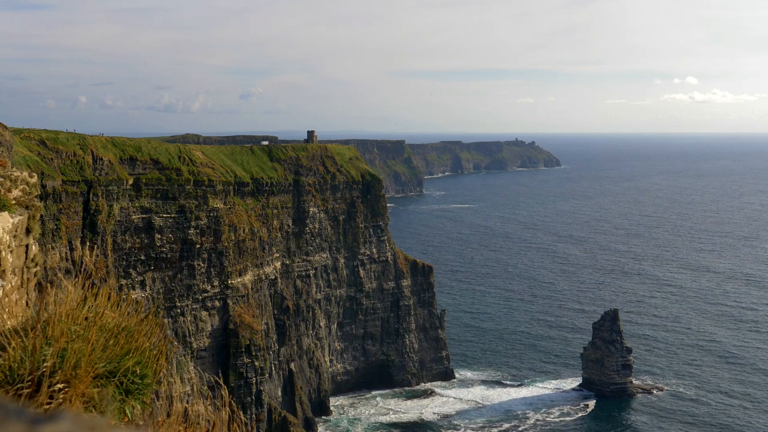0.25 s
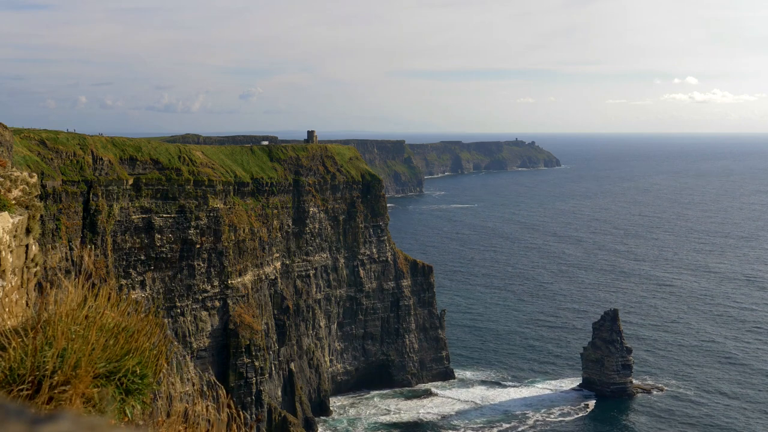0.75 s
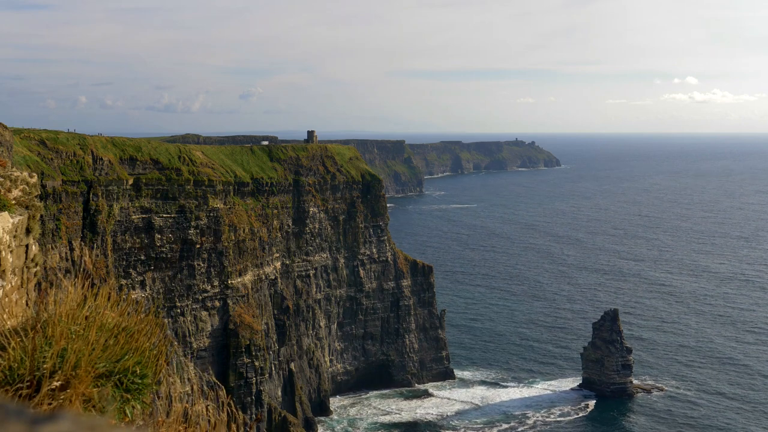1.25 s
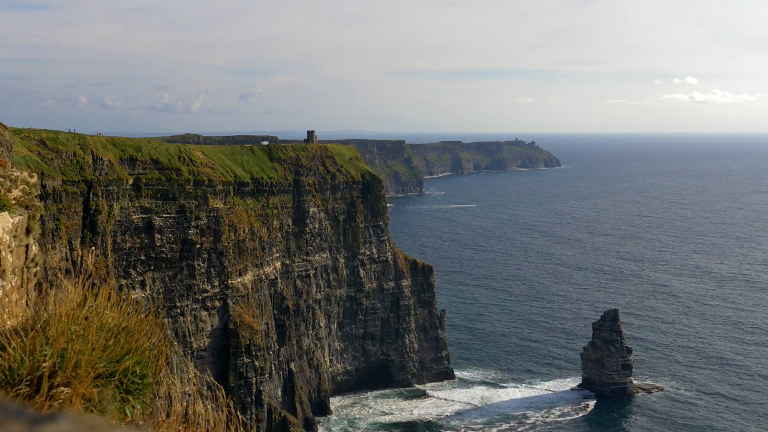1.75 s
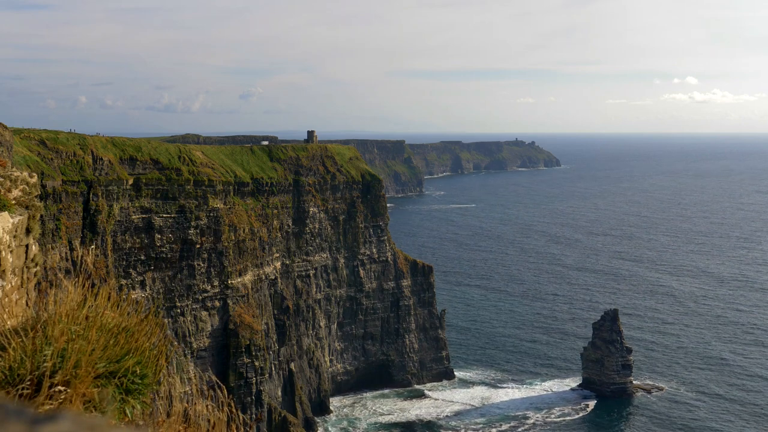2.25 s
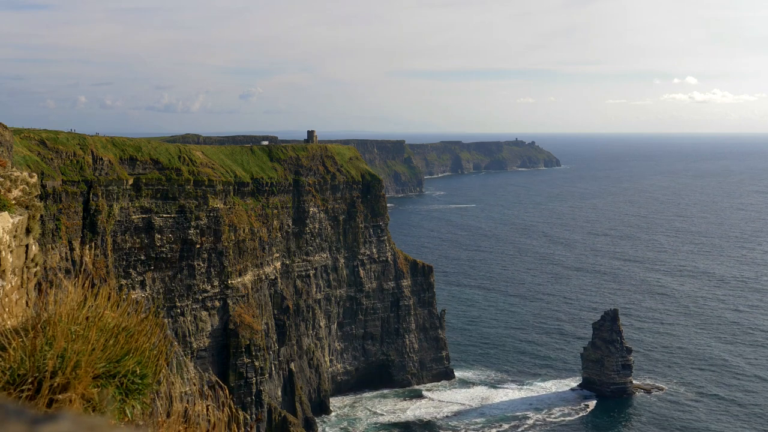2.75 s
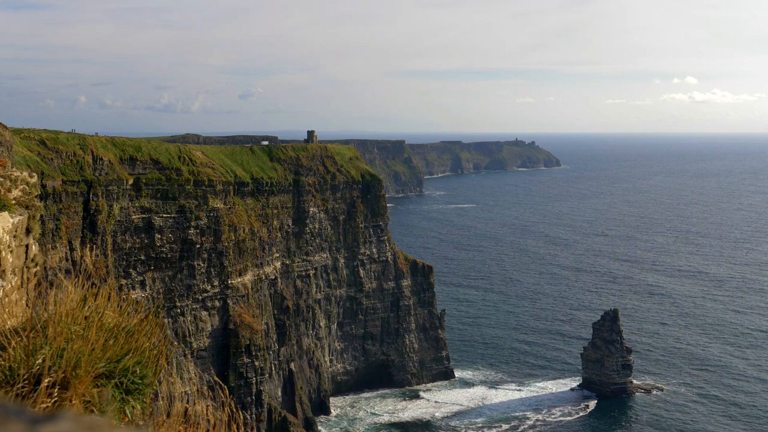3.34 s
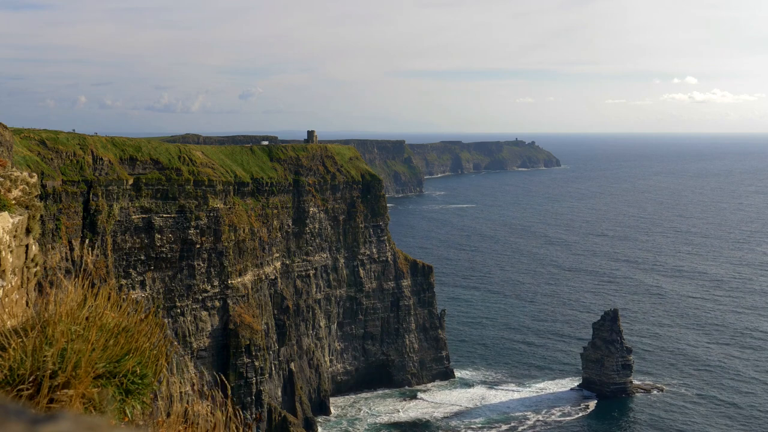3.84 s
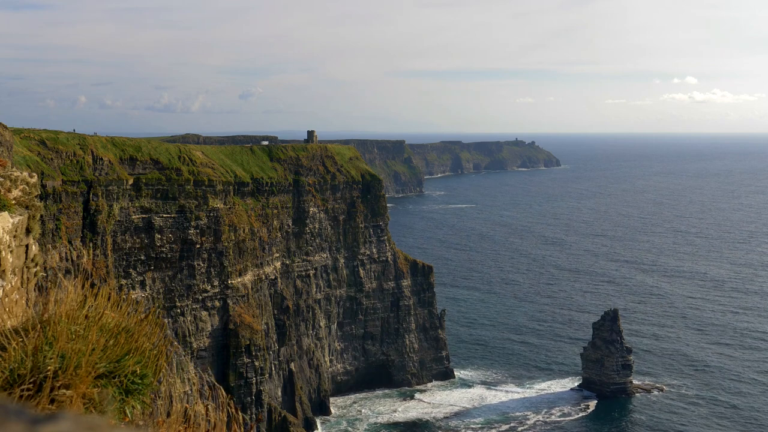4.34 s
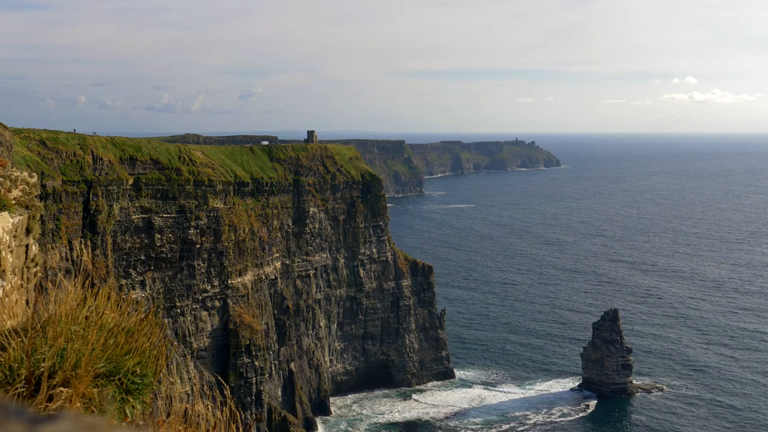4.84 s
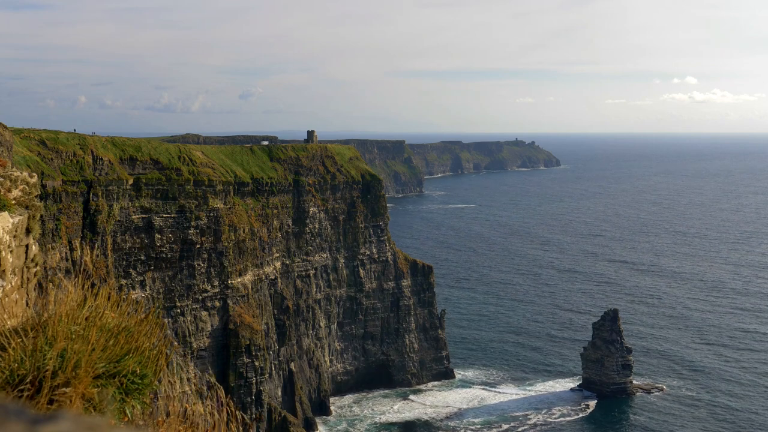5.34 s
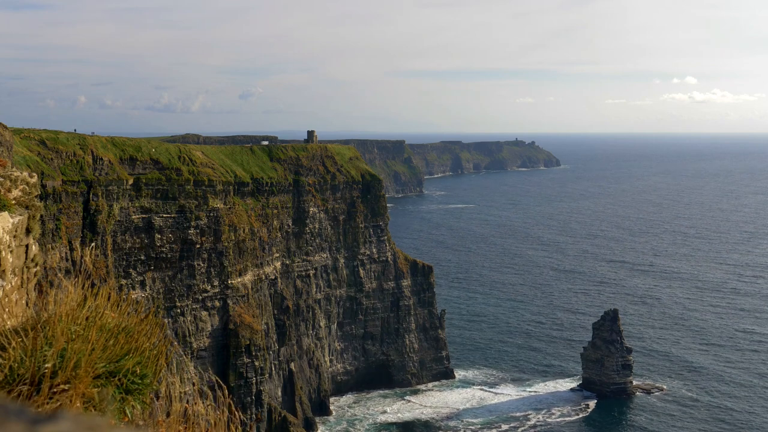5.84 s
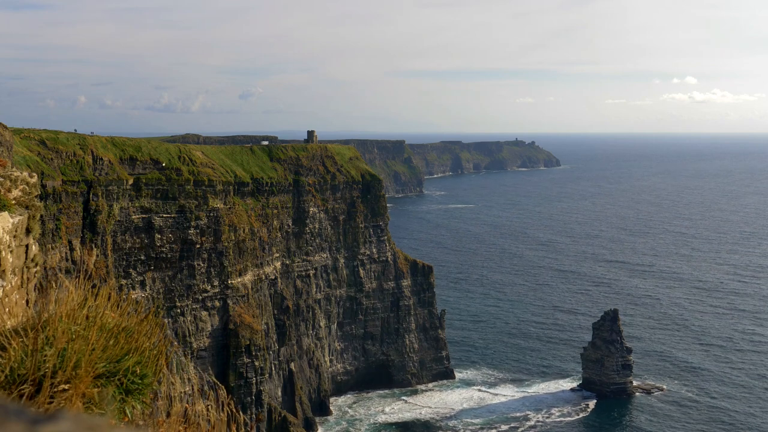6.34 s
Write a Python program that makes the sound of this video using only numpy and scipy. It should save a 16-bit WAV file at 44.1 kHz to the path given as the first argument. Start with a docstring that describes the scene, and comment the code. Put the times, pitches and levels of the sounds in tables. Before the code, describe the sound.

Distant sea surf rumbles below a cliff under short gull cries and thin whistles, with one low wave boom and hissing foam.

```python
"""Below a sea cliff, gulls cry over a steady far roar of surf; one wave booms on the rock and its foam hisses.
The water is a sum of countless random sources, so it is noise with a shaped spectrum and a moving level.
The birds are pitched sources: thin whistles, harmonic cries, and squawks of pulses through a resonant
throat, all scattered back by the rock face. The stereo image is very wide: most sound reaches the two
channels in opposite polarity, and only the boom is alike in both."""
import sys
import numpy as np
from scipy import signal
from scipy.fft import rfft, irfft, next_fast_len
from scipy.io import wavfile
from scipy.ndimage import uniform_filter1d, map_coordinates

SR = 44100
rng = np.random.default_rng(int(sys.argv[2]) if len(sys.argv) > 2 else 0)


def master_out(mix):
    """Clip the mix to full scale and print it as 16-bit PCM to the path in sys.argv[1]."""
    frames = np.transpose(np.atleast_2d(mix))
    ceiling = np.clip(frames, -1, 1)
    pcm = np.round(ceiling * 32767).astype(np.int16)
    wavfile.write(sys.argv[1], SR, pcm)


N = 289737

# Spectral densities of the water's noises: frequency_hz, relative_density_db
ROAR_SPECTRUM = [(15, -34), (40, -45), (90, -1.5), (140, 1), (200, -5), (300, -14), (450, -23.5),
                 (800, -38), (3000, -120)]
WASH_SPECTRUM = [(150, -1), (300, -4), (600, -2), (1000, -0.5), (1400, 0.5), (2100, -0.5), (3000, -4),
                 (5000, -22), (9000, -49), (12000, -60)]
BOOM_SPECTRUM = [(12, -10), (25, -8), (45, -5), (70, 0.5), (110, -1), (160, -11.5), (300, -29.5),
                 (1500, -120)]
SEETHE_SPECTRUM = [(500, -70), (1200, -14.5), (2200, -3.5), (3200, -0.5), (4600, -0.5), (6000, -5.5),
                   (9000, -63), (12000, -60)]
HISS_SPECTRUM = [(1000, -68), (3000, -21), (5000, -3.5), (6500, -1.5), (8000, -5), (10000, -12),
                 (11800, -18), (12400, -28), (13600, -42)]
SPRAY_SPECTRUM = [(1000, -30), (2500, -2), (5000, -4), (9000, -5), (13000, -39)]
# Left-right likeness of wash, foam and spray: frequency_hz, correlation
SURF_CORRELATION = [(280, -.33), (600, -.43), (1300, -.33), (2800, -.42), (6000, -.53), (13000, -.45)]
# Envelopes of the far surf: time_s, roar_db, wash_db
SURF_LEVELS = [(0.0, -51, -53.5), (0.25, -50, -53.5), (0.45, -49.5, -50), (0.7, -49, -54),
               (1.1, -50.5, -54.5), (1.72, -48.5, -53.5), (2.5, -50.5, -52), (3.3, -46.5, -52.5),
               (4.0, -46.5, -51), (4.26, -44, -51.5), (4.6, -48, -51), (4.94, -47.5, -50), (5.15, -50, -50),
               (6.2, -49, -53), (6.57, -50, -53.5)]
# The roar leans left as the wave drains: time_s, left_over_right_db
ROAR_BALANCE = [(0, -1), (1.5, 1.5), (3.4, 3), (4.7, 5), (5.2, 3), (6.57, 2)]
# Envelope of the wave on the rock: time_s, level_db
BOOM_LEVELS = [(0.0, -49.5), (0.6, -47), (1.1, -50.5), (1.3, -46.5), (1.65, -49), (2.25, -45), (2.55, -40),
               (2.8, -44.5), (2.95, -40.5), (3.1, -48), (3.44, -38.5), (3.74, -40.5), (3.95, -35),
               (4.15, -38), (4.35, -39.5), (4.75, -41.5), (5.2, -45.5), (5.7, -46), (6.57, -47)]
# Envelopes of the foam: time_s, hiss_db, seethe_db
FOAM_LEVELS = [(0.0, -65, -59.5), (0.8, -62, -59), (1.1, -63, -58), (1.68, -58, -55), (1.78, -56, -53.5),
               (2.25, -56, -52.5), (2.42, -53, -49.5), (2.51, -50.5, -47), (2.69, -52, -49),
               (3.3, -50.5, -49.5), (3.82, -50, -48.5), (4.34, -51.5, -50), (5.07, -52, -50.5),
               (5.6, -54, -50.5), (6.57, -55, -53.5)]
# Bursts of spray: peak_s, left_db, right_db, half_length_s
SPRAY_BURSTS = [(0.947, -62, -58, 0.013), (1.748, -58, -52, .01), (2.155, -56, -52, 0.022),
                (6.018, -50, -54, 0.013)]
# Whistles that bend once:
# start_s, to_turn_s, after_turn_s, start_hz, turn_hz, end_hz, left_db, right_db, fade_db
SHORT_WHISTLES = [ (0.0, .03, .03, 4800, 4750, 4750, -60, -53, 0),
                  (0.0, .01, .02, 2420, 2410, 2370, -50, -52, 2),
                  (0.008, .02, 0.04, 2940, 2880, 2740, -50, -55, 10),
                  (0.808, 0.039, 0.055, 2020, 2020, 1940, -58, -49.5, 0),
                  (1.715, 0.04, .05, 4980, 4780, 4520, -53, -60, 2),
                  (2.348, .01, 0.032, 3020, 2980, 2800, -42, -52, 0),
                  (2.468, .04, .07, 4930, 4990, 5010, -47, -53, 0),
                  (4.1, 0.065, 0.015, 5040, 4940, 4990, -48, -57, 0),
                  (4.195, .02, .022, 5180, 5160, 5080, -48, -58, 0),
                  (4.232, .015, .03, 2460, 2470, 2480, -44.5, -58, -3),
                  (4.82, .01, .07, 4780, 4730, 4500, -49, -58, 0),
                  (5.205, .01, .025, 5180, 5130, 4980, -45, -58, 0),
                  (5.485, .02, .025, 3760, 3780, 3740, -49, -52, 0),
                  (5.778, .025, .015, 2380, 2450, 2560, -56, -50, 0),
                  (5.815, .025, .07, 3070, 3080, 2800, -57, -45.5, -8), ]
# Whistles that waver and swell: left_over_right_db, [time_s, pitch_hz, louder_channel_db]
WHISTLE_CONTOURS = [ (-9, [(5.298, 2300, -54), (5.31, 2370, -47), (5.328, 2530, -45), (5.345, 2700, -49),
                    (5.352, 2780, -58)]), (-15, [(.338, 4520, -54), (.364, 4760, -40.5), (.44, 5100, -44),
                    (.46, 5120, -46.5), (.56, 4890, -44.5), (.586, 4745, -49), (.64, 4695, -50),
                    (.65, 4680, -65)]), (-17, [(1.255, 4060, -56), (1.266, 4315, -44), (1.28, 4740, -44),
                    (1.3, 4960, -43), (1.326, 5105, -49), (1.358, 5016, -43), (1.376, 5080, -49),
                    (1.44, 5120, -51.5), (1.49, 5000, -47), (1.535, 4930, -48), (1.57, 4950, -53),
                    (1.6, 4920, -53), (1.608, 4920, -64)]), (8, [(1.378, 4450, -56), (1.392, 4670, -45),
                    (1.42, 4830, -51), (1.44, 4980, -51), (1.45, 5080, -62)]), (11, [(3.308, 4910, -52),
                    (3.322, 4870, -47), (3.36, 4780, -39), (3.38, 4780, -41.5), (3.405, 4770, -40),
                    (3.422, 4680, -38), (3.445, 4740, -41.5), (3.478, 4850, -41), (3.505, 4780, -54)]),
                    (21, [(4.472, 4550, -54), (4.48, 4620, -43), (4.495, 4730, -41), (4.51, 4800, -46),
                    (4.527, 4860, -44), (4.535, 4890, -58)]), (7, [(4.718, 4220, -54), (4.732, 4260, -44),
                    (4.76, 4330, -46), (4.79, 4480, -52), (4.82, 4800, -48), (4.85, 4850, -50),
                    (4.9, 4830, -52), (4.925, 4850, -60)]), (15, [(5.42, 4940, -64), (5.44, 4990, -57),
                    (5.46, 5150, -48), (5.485, 5220, -48), (5.525, 5450, -44), (5.545, 5520, -56),
                    (5.58, 5600, -54), (5.625, 5680, -50), (5.655, 5650, -62)]), ]
# Resonances of the squawking throat: centre_hz, bandwidth_hz, gain_db
FORMANTS = [(2220, 150, -3), (2940, 220, -6.5)]
# Short harsh cries: start_s, length_s, left_db
SQUAWK_EVENTS = [(2.418, 0.025, -33.5), (3.423, 0.049, -35.5)]
# Harmonic cries: left_over_right_db, [time_s, pitch_hz, second_partial_db (louder channel),
# third_over_second_db, fourth_over_second_db]
CRY_CONTOURS = [ (3, [(4.966, 1424, -58, -6, -20), (4.98, 1440, -50, -6, -20), (5.012, 1470, -50, -12, -22),
                (5.035, 1390, -53, -14, -25), (5.055, 1340, -48, -16, -25), (5.1, 1275, -49, -16, -25),
                (5.12, 1250, -58, -16, -25)]), (4, [(5.452, 1425, -54, -9, -19),
                (5.465, 1440, -45, -9, -19), (5.485, 1460, -42, -12, -22), (5.495, 1470, -54, -12, -22)]),
                (13, [(.392, 1063, -62, 0, -14), (.41, 1095, -52, 0, -14), (.44, 1125, -53, -2, -14),
                (.475, 1120, -53, -10, -14), (.5, 1101, -48, -1, -14), (.525, 1077, -47, -3, -12),
                (.54, 1072, -60, 8, -2), (.56, 1060, -51, -1, -7), (.6, 1040, -47, -3, -9),
                (.618, 1010, -50, -6, -8), (.63, 985, -62, -6, -8)]), (9.1, [(2.306, 1070, -51, -4, -10),
                (2.318, 1100, -40, -3, -10), (2.335, 1140, -39, -7, -14), (2.35, 1185, -38, -12, -18),
                (2.358, 1195, -52, -6, -18)]), (12, [(.058, 1055, -62, 8, -6), (.075, 1053, -50, 7, -8),
                (.1, 1042, -48.5, -2, -12), (.15, 1035, -46, -3, -13), (.17, 1025, -54, 3, -8),
                (.194, 975, -61, 2, -6)]), (13, [(1.295, 1092, -56, -6, -20), (1.315, 1130, -42.5, -8, -22),
                (1.35, 1130, -41.5, -11, -22), (1.385, 1065, -44, -5, -10), (1.42, 1036, -43, -13, -14),
                (1.455, 975, -42, -18, -18), (1.466, 900, -60, -16, -18)]),
                (8, [(5.525, 1347, -54, -23, -30), (5.536, 1345, -37, -23, -30),
                (5.57, 1313, -39, -23, -30), (5.582, 1295, -49, -23, -30), (5.61, 1260, -44, -23, -30),
                (5.635, 1200, -43, -23, -30), (5.648, 1160, -58, -23, -30)]),
                (15, [(5.87, 1365, -58, 8, -25), (5.885, 1410, -42, -2, -25), (5.91, 1440, -41.5, -5, -25),
                (5.927, 1415, -38, -12, -25), (5.945, 1330, -48, -14, -25), (5.965, 1290, -43, -14, -25),
                (6.01, 1210, -49, -14, -25), (6.035, 1157, -52, -14, -25), (6.07, 1055, -56, -14, -25)]),
                (15, [(.83, 1060, -56, -4, -20), (.85, 1109, -48, -2, -20), (.88, 1130, -47, -6, -20),
                (.915, 1128, -45, -10, -18), (.95, 1095, -45, -4, -10), (1.01, 1065, -50, -3, -4),
                (1.05, 1030, -44.5, -8, -12), (1.068, 985, -60, -10, -14)]),
                (13, [(1.762, 1011, -62, 12, -6), (1.775, 1045, -54, 7, -6), (1.783, 1083, -40, -5, -12),
                (1.812, 1142, -40, -10, -20), (1.828, 1125, -43, -10, -20), (1.84, 1073, -37, -20, -25),
                (1.875, 1017, -36.5, -18, -25), (1.905, 978, -39.5, -14, -25), (1.93, 915, -47, -16, -25),
                (1.955, 855, -51, -16, -25), (1.965, 840, -60, -16, -25)]),
                (11, [(2.38, 1184, -52, -16, -25), (2.39, 1190, -42, -16, -25),
                (2.406, 1174, -39, -16, -25), (2.416, 1072, -38, -14, -25), (2.432, 1027, -32.5, -12, -25),
                (2.445, 986, -41, -16, -25), (2.455, 972, -38, -16, -25), (2.48, 910, -46, -20, -25),
                (2.496, 844, -48, -20, -25)]), ]

TIME_S = np.arange(N) / SR
ANTIPHASE = np.array([[1], [-1]])


def amp(db):
    """Amplitude ratio: tenfold for every 20 dB."""
    return 10 ** (np.asarray(db) / 20)


def unit_rms(x):
    """Normalisation to unit mean power."""
    return x / np.sqrt(np.mean(x ** 2) + 1e-20)


def along(points, hz):
    """Interpolation of (frequency_hz, value) points on a logarithmic frequency axis."""
    knots_hz, values = np.transpose(points)
    return np.interp(np.log(hz + 1), np.log(knots_hz + 1), values)


def curves(rows, t=TIME_S):
    """Linear interpolation in time of each column after the first."""
    knots_s, *columns = np.transpose(rows)
    return [np.interp(t, knots_s, column) for column in columns]


def wobble(rate_hz, size=N):
    """Smooth random modulation: a spline through Gaussian knots."""
    knots = rng.standard_normal(int(size * rate_hz / SR) + 4)
    return map_coordinates(knots, [np.arange(size) * rate_hz / SR])


def filtered(x, response):
    """Linear filtering: the spectrum is multiplied by a frequency response."""
    size = next_fast_len(N + SR // 2)
    return irfft(rfft(x, size) * response(np.fft.rfftfreq(size, 1 / SR)), size)[..., :N]


def panned(db, pan_db):
    """Stereo placement by a left-right level difference."""
    return amp([db + pan_db / 2, db - pan_db / 2])


def water_noise(spectrum, correlation, patchy_db):
    """Coloured noise with patches of random gain; the mid-to-side ratio sets the channels' correlation."""
    def mid_side(hz):
        angle = np.arccos(np.clip(along(correlation, hz), -1, 1)) / 2
        return amp(along(spectrum, hz)) * [np.cos(angle), np.sin(angle)]

    cells = signal.stft(rng.standard_normal((2, N)), nperseg=512)[2]
    patches = uniform_filter1d(rng.standard_normal(cells.shape[1:]), size=8, axis=0)
    patches = unit_rms(uniform_filter1d(patches, size=10, axis=1))
    noise = signal.istft(cells * amp(patchy_db * patches), nperseg=512)[1][:, :N]
    mid, side = filtered(noise, mid_side)
    return np.array([mid + side, mid - side]) / np.std(mid)


def far_surf():
    """Incoherent addition: distant breakers merge into a low roar and a broad wash."""
    roar_db, wash_db = curves(SURF_LEVELS)
    roar = water_noise(ROAR_SPECTRUM, correlation=[(60, -.46), (140, -.66), (300, -.3)], patchy_db=.5)
    wash = water_noise(WASH_SPECTRUM, SURF_CORRELATION, patchy_db=1.07)
    return panned(roar_db, *curves(ROAR_BALANCE)) * roar + panned(wash_db, pan_db=-.5) * wash


def wave_boom():
    """Impact of water on rock: a swell of low noise, nearly coherent between the channels."""
    level_db, = curves(BOOM_LEVELS)
    pan_db = 3.5 + 1.5 * wobble(6)
    boom = water_noise(BOOM_SPECTRUM, correlation=[(30, .9), (70, .9), (130, .9)], patchy_db=.5)
    return panned(level_db, pan_db) * boom


def foam():
    """Common modulation: pockets of foam collapse together, so seethe and hiss flicker in step."""
    hiss_db, seethe_db = curves(FOAM_LEVELS)
    collapse_db = .22 * wobble(7.6)
    seethe = amp(seethe_db) * water_noise(SEETHE_SPECTRUM, SURF_CORRELATION, patchy_db=2)
    hiss = amp(hiss_db) * water_noise(HISS_SPECTRUM, SURF_CORRELATION, patchy_db=1.57)
    return panned(collapse_db, pan_db=.8) * (seethe + hiss)


def spray():
    """Noise transients: spray thrown off the rock hisses under brief Gaussian envelopes."""
    envelope = sum(amp([[left_db], [right_db]]) * np.exp(-((TIME_S - peak_s) / half_s) ** 2)
                   for peak_s, left_db, right_db, half_s in SPRAY_BURSTS)
    return envelope * water_noise(SPRAY_SPECTRUM, SURF_CORRELATION, patchy_db=2)


def cliff_echo(x, t60_s=1.0, delay_samples=600):
    """Diffuse reflection: the rock face answers late, with an exponentially decaying noise tail."""
    t = np.arange(SR // 2) / SR
    tail = rng.standard_normal((2, len(t))) * amp(-60 * t / t60_s)
    delayed = np.pad(x, ((0, 0), (delay_samples, 0)))
    return signal.fftconvolve(delayed, tail / np.linalg.norm(tail[0]), axes=1)[:, :N]


def short_whistles(attack_s=.012, release_s=.022):
    """Frequency modulation: a pure tone bends to a turn and away, and moving air makes it waver."""
    out = np.zeros((2, N))
    for start_s, in_s, out_s, start_hz, turn_hz, end_hz, left_db, right_db, fade_db in SHORT_WHISTLES:
        length_s = in_s + out_s
        start, size = round(start_s * SR), round(length_s * SR)
        t = np.arange(size) / SR
        before, after = np.clip(1 - t / in_s, 0, 1), np.clip((t - in_s) / out_s, 0, 1)
        # Exponents above 1 round off the turn.
        hz = turn_hz + (start_hz - turn_hz) * before ** 2.06 + (end_hz - turn_hz) * after ** 1.18
        hz = uniform_filter1d(hz, size=500, mode="nearest")
        hz *= 1 + .003 * wobble(64, size) + .003 * wobble(18.2, size)  # waver and slower drift
        tone = np.sqrt(2) * np.sin(2 * np.pi * np.cumsum(hz) / SR)
        attack, release = np.minimum([attack_s, release_s], length_s / 3)
        edges = np.clip(np.minimum(t / attack, (length_s - t) / release), 0, 1)
        flutter_db = 2 * np.array([wobble(55, size) for _ in "LR"])
        gain = edges * amp([[left_db], [right_db]] + fade_db * after + flutter_db)
        out[:, start:start + size] += ANTIPHASE * gain * tone
    return out


def glide(pan_db, rows, waver, edge_s=.004):
    """Phase as the integral of pitch: returns a call's span, phase, stereo gain and partial levels."""
    t = np.arange(rows[0][0], rows[-1][0], 1 / SR)
    start, size = round(t[0] * SR), len(t)
    hz, level_db, *partials_db = [uniform_filter1d(c, size=300, mode="nearest") for c in curves(rows, t)]
    edges = np.clip(np.minimum(t - t[0], t[-1] - t) / edge_s, 0, 1)
    flutter_db = 1.5 * np.array([wobble(57.4, size) for _ in "LR"])
    far_side_db = np.minimum([[pan_db], [-pan_db]], 0)
    gain = np.sqrt(2) * edges * amp(level_db + flutter_db + far_side_db) * ANTIPHASE
    phase = 2 * np.pi * np.cumsum(hz * (1 + waver * wobble(63.6, size))) / SR
    return slice(start, start + size), phase, gain, partials_db


def long_whistles():
    """Frequency and amplitude modulation: a single partial wavers and swells."""
    out = np.zeros((2, N))
    for pan_db, rows in WHISTLE_CONTOURS:
        span, phase, gain, _ = glide(pan_db, rows, waver=.003)
        out[:, span] += gain * np.sin(phase)
    return out


def throat(hz):
    """Formant resonance: band-pass responses added in alternating polarity."""
    return sum((-1) ** k * amp(db) * 1j * hz * width / (centre ** 2 - hz ** 2 + 1j * hz * width)
               for k, (centre, width, db) in enumerate(FORMANTS))


def squawks(pulse_hz=371, edge_s=.0045, fade_db=-4.5):
    """Source and filter: uneven pulses and a little noise ring the throat in short harsh cries."""
    cycles = np.cumsum(pulse_hz * (1 + .049 * wobble(200))) / SR
    pulses = np.diff(np.floor(cycles), prepend=0) * amp(1.7 * wobble(250))
    voice = unit_rms(filtered(pulses + .03 * rng.standard_normal(N), throat))
    envelope = np.zeros(N)
    for start_s, length_s, level_db in SQUAWK_EVENTS:
        t = TIME_S - start_s
        edges = np.clip(np.minimum(t, length_s - t) / edge_s, 0, 1) ** 2
        envelope += edges * amp(level_db + fade_db * np.clip(t / length_s, 0, 1))
    return voice * envelope * ANTIPHASE * amp([[0], [-12]])  # louder on the left


def gull_cries():
    """Harmonic series: a periodic voice with a weak fundamental and shifting upper partials."""
    out = np.zeros((2, N))
    for pan_db, rows in CRY_CONTOURS:
        span, phase, gain, (third_db, fourth_db) = glide(pan_db, rows, waver=.005)
        voice = amp(-19) * np.sin(phase) + np.sin(2 * phase) + amp(third_db) * np.sin(3 * phase)
        voice += amp(fourth_db) * (np.sin(4 * phase) + amp(-6) * np.sin(5 * phase))
        out[:, span] += gain * voice
    return out


def scene():
    """Superposition: the birds, their echo and the sea add as pressures."""
    birds = short_whistles() + gull_cries() + long_whistles() + squawks()
    return birds + amp(-15) * cliff_echo(birds) + far_surf() + wave_boom() + foam() + spray()


def record(dry):
    """Band limiting by an ideal low-pass filter."""
    return filtered(dry, lambda hz: hz < 13640)


dry = scene()
out = record(dry)
master_out(out)
```